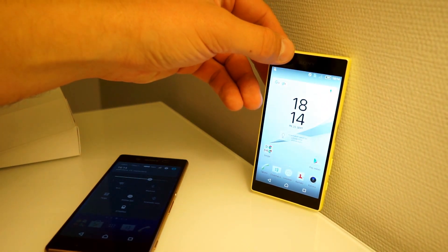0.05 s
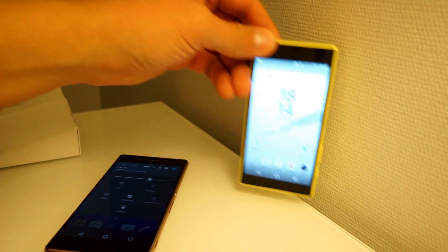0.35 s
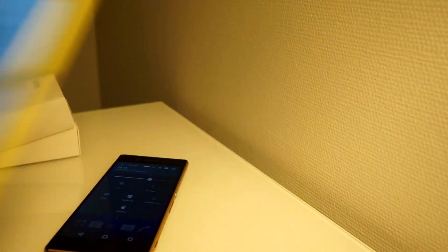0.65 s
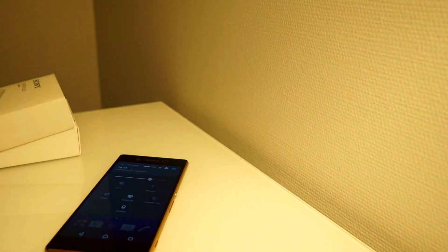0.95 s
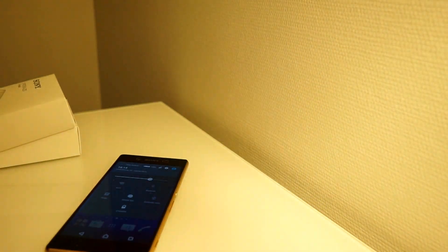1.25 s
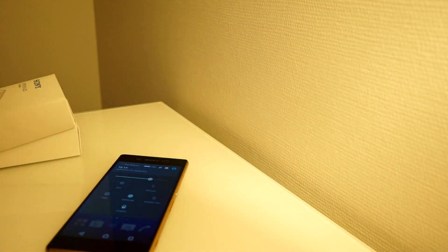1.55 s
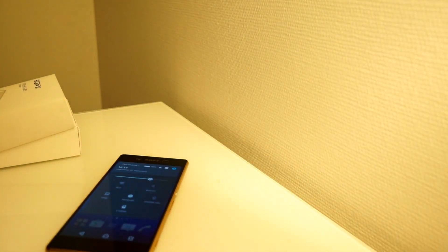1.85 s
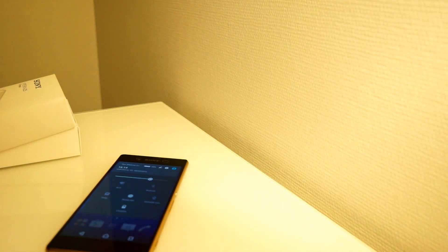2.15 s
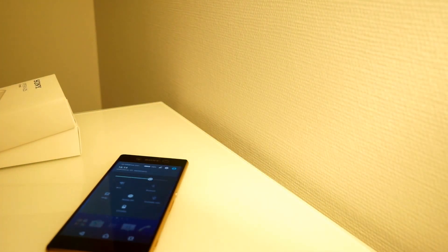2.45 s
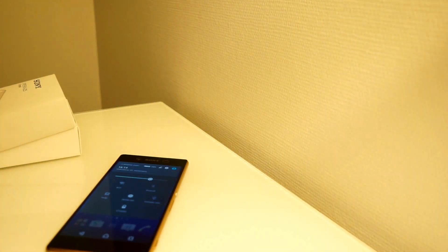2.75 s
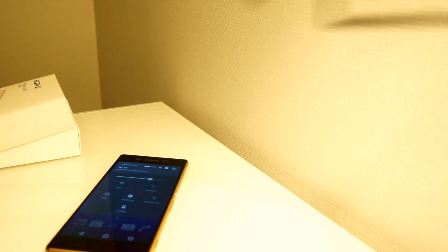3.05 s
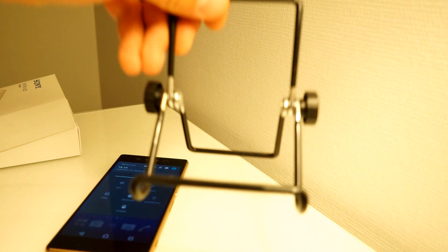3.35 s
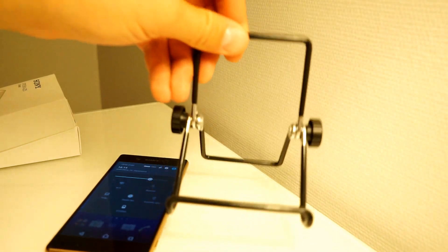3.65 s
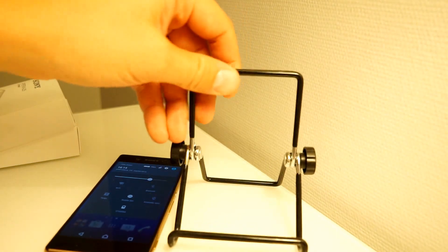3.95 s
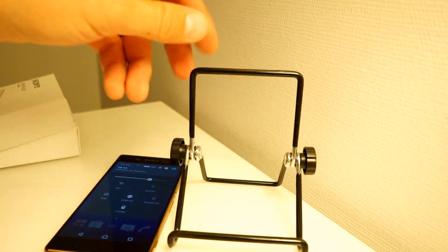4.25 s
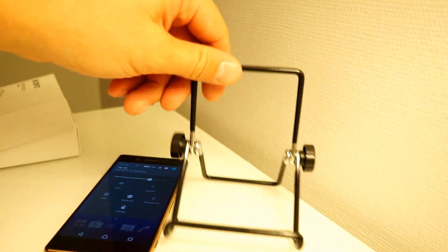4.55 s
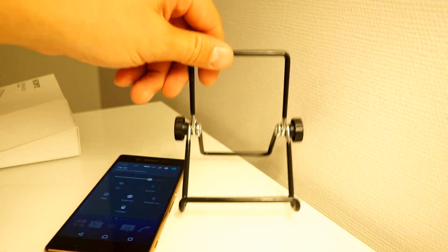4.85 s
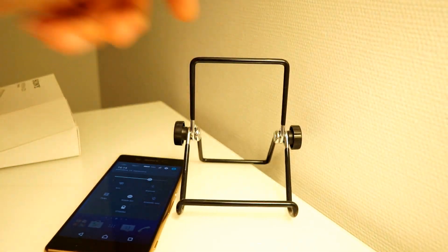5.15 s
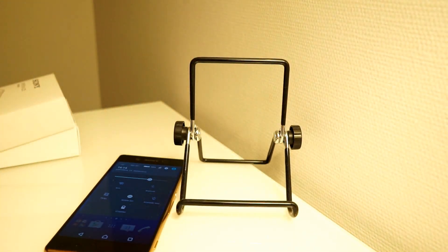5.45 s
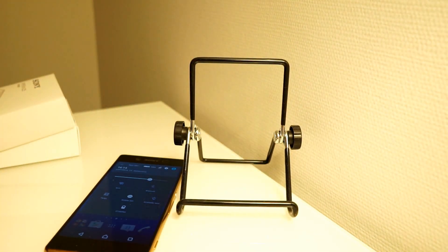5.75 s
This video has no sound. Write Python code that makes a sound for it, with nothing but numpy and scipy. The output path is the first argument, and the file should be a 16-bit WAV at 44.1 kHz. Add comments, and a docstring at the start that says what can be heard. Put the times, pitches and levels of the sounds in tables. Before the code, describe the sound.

In a small room, fingers brush softly over a surface. A phone is put down on furniture slightly to the right, knocks with a hollow ring and rocks quickly to rest. Then a metal wire stand clacks sharply onto a booming tabletop, skids briefly, is lifted and set down again. Close to the microphone, a camera whirs and its focus motor faintly rasps over steady room air.

```python
"""A wire stand clacks onto a booming tabletop, skids, is lifted and set down again, in a small room.
Before that, a phone is lifted from the table and put down on furniture to the right, where it
knocks with a hollow ring and rocks to rest. Fingers brush the surfaces with a bright hiss.
Close by, a camera whirs and its focus motor faintly rasps and whines over the room air."""
import sys
import numpy as np
from scipy import signal
from scipy.fft import rfft, irfft, next_fast_len
from scipy.io import wavfile
from scipy.ndimage import uniform_filter1d

SR = 44100
rng = np.random.default_rng(int(sys.argv[2]) if len(sys.argv) > 2 else 0)


def pcm_store(signal):
    """Save signal as 16-bit PCM."""
    levels = np.round(np.clip(np.atleast_2d(signal), -1, 1) * 32767)
    wavfile.write(sys.argv[1], SR, levels.astype(np.int16).T)


N = 256220
TIME = np.arange(N) / SR
AGE = TIME[:SR // 4]  # seconds since a hit

# fast runs of the focus motor: (start [s], end [s], rasp [dB], rattle [dB])
FOCUS_RUNS = [(-.051, .663, -55, -53.5), (1.178, 1.627, -54.5, -59), (1.667, 1.918, -54.5, -59)]
# short, slow focus trims: (start [s])
FOCUS_TRIMS = [2.566, 3.044, 3.518, 4.598, 4.984, 5.465]
TRIM_S = .1
# how alike left and right are in diffuse sound: (frequency [Hz], likeness [0-1])
STEREO_LIKENESS = [(60, .99), (250, .96), (600, .7), (1400, .3), (3500, .1), (16000, 0)]


def wire_stand(crack_db=-8):
    """The wire frame clacks and its joints tick, while the tabletop thuds and booms beneath it."""
    # knocks: (time [s], clack [dB], thud [dB], contact hardness [Hz], boom [dB])
    hits = [(2.0493, -28.5, -52, 2500, -69), (2.064, -28.5, -39, 3800, -75),
            (2.1185, -32.5, -42, 4430, -72), (2.21, -39, -42.5, 5000, -79), (3.812, -13, -37, 6900, -35.5),
            (3.9495, -10, -25, 3660, -45), (3.9711, -20.5, -25, 3930, -37), (4.1088, -17, -26.5, 5370, -42),
            (4.475, -43, -56, 5500, -52.5), (4.5456, -22, -33, 5100, -35), (4.9287, -8.5, -31, 1980, -44),
            (4.9631, -19, -36.5, 5150, -37.5), (4.975, -20, -30.5, 2500, -46),
            (5.052, -29.5, -33, 1600, -49)]
    # modes of the frame, the tabletop and its boom: (frequency [Hz], level [dB], t60 [s])
    wire_modes = [(596, -17, 0.035), (774, -15.5, 0.042), (1074, -22, 0.047), (1296, -11, 0.019),
                  (1585, -10, 0.048), (1662, -7, 0.044), (1917, -11.5, 0.049), (2132, -16.5, 0.046),
                  (2393, -16, 0.047), (2542, -19, 0.045), (3137, -11.5, 0.017), (3550, -11, 0.017),
                  (4040, -14.5, 0.027), (4780, -11, 0.01)]
    table_modes = [(145.5, -15, 0.069), (178, -11, 0.047), (303.7, -4, 0.091), (368.6, -6, 0.072),
                   (444, -8.5, 0.039), (582, -8, 0.071), (819, -9.5, 0.15)]
    boom_modes = [(250.4, 0, 0.13)]
    # spectra of the frame's crowded modes and of its joints: (frequency [Hz], level [dB])
    clack_colour = [(150, -54), (400, -12), (800, 4), (1600, 6), (2300, 6.5), (2800, 5), (3400, -4),
                    (5000, -2.5), (7000, -11), (16000, -67)]
    tick_colour = [(500, 13.5), (3000, -8), (6000, 6.5), (9000, 6), (12000, -3.5), (16000, -16)]
    out = np.zeros((2, N))
    for s, clack_db, thud_db, hardness_hz, boom_db in hits:
        wire = ring(wire_modes, scatter_db=2, detune=.015)
        thud = from_db(thud_db) * ring(table_modes, scatter_db=1.2, detune=.02)
        boom = from_db(boom_db) * ring(boom_modes, scatter_db=0, detune=.02)
        burst = from_db(crack_db) * crack(clack_colour, t60=.071)
        clack = from_db(clack_db) * soften(wire + burst, hardness_hz)
        # stronger and harder blows tick louder
        tick_db = -22 + .68 * clack_db + 4 * np.log2(hardness_hz / 4000)
        tick = from_db(tick_db) * crack(tick_colour, t60=.023)
        add(out, s, clack + thud + boom + tick)
    # a small tabletop radiates no deep bass
    return place(low_cut(out, hz=135, order=3), left_db=-2)


def skid(start_s=3.822, end_s=3.95, fade_db_per_s=66, rough_db=3):
    """The stand's foot sticks and slips between two knocks, fading as it slows."""
    # spectrum of the scrape: (frequency [Hz], level [dB])
    colour = [(60, -52), (120, -18), (250, -2), (500, -14), (1000, 0), (1700, 7), (2300, -1.5), (3000, -9),
              (5400, -6.5), (7000, -21), (10000, -29), (16000, -53)]
    slips = wobble(samples=130)
    scrape = rms_one(hiss(colour) * from_db(rough_db * slips))
    level_db = -35 - fade_db_per_s * np.maximum(TIME - start_s, 0)
    return from_db(level_db) * gate(start_s, end_s) * scrape * pan(left_db=-2)


def phone(tap_trim_db=-7):
    """Edges shuffle and tap on the board; the flat landing rings hollow, then the phone rocks to rest."""
    # knocks: (time [s], tap [dB], board thud [dB], contact hardness [Hz], hollow ring [dB])
    hits = [(1.9334, -18, -62, 972, -54), (1.977, -27, -66, 1000, -65), (2.0132, -18, -61, 1140, -41),
            (2.051, -16.5, -69, 1250, -53), (2.3241, -20, -57, 3800, -28.5),
            (2.3545, -16, -26.5, 4570, -31), (2.3918, -15, -35.5, 3200, -13),
            (2.441, -24.5, -27, 2840, -52), (2.698, -30, -40.5, 1010, -43.5)]
    # slides over the board: (start [s], end [s], level [dB])
    shuffles = [(0.274, 0.306, -57.5), (1.818, 2.147, -57), (2.433, 2.636, -56.5)]
    # modes of the board and of the hollow ring: (frequency [Hz], level [dB], t60 [s])
    board_modes = [(112, -11.5, 0.063), (163, -7, 0.074), (247.5, -19, 0.19), (312, -5, 0.13),
                   (400, -2, 0.055), (500, -14, 0.035), (620, -13, 0.036), (749, -5, 0.078)]
    hollow_modes = [(709, -13.5, 0.087), (868, 0, 0.077), (1130, -4.5, 0.04), (1518, -9, 0.036),
                    (1637, -6, 0.022), (2700, -26, 0.009), (3610, -19, 0.018)]
    # spectra of a tap and of a slide: (frequency [Hz], level [dB])
    tap_colour = [(100, -83), (300, -14), (700, 1.5), (1100, -5), (2000, -9.5), (3400, -8), (4600, -23.5),
                  (9000, -14.5), (16000, -8.5)]
    shuffle_colour = [(60, -56), (150, -14), (270, 2), (450, 1.5), (750, 3), (1200, -3), (3000, -11.5),
                      (8000, -21.5)]
    shuffling = sum(from_db(db) * swell(start, end, attack_s=.03, release_s=.072)
                    for start, end, db in shuffles)
    out = shuffling * hiss(shuffle_colour)
    for s, tap_db, thud_db, hardness_hz, hollow_db in hits + rocking():
        tap = from_db(tap_db + tap_trim_db) * soften(crack(tap_colour, t60=.059), hardness_hz)
        thud = from_db(thud_db) * ring(board_modes, scatter_db=1.2, detune=.01)
        hollow = from_db(hollow_db) * ring(hollow_modes, scatter_db=.5, detune=0)
        add(out, s, tap + thud + hollow)
    out[0] = np.roll(out[0], 4)  # sound from the right reaches the left side later
    return place(low_cut(out, hz=70, order=2), left_db=-4)


def rocking(start_s=2.482, period_s=.0395, loss_db=1.6, softening=.88):
    """The phone rocks from edge to edge: four more rows of hits, each weaker and duller than the last."""
    tap_db, thud_db, hardness_hz, hollow_db = -24.5, -35.5, 1400, -58
    return [(start_s + k * period_s, tap_db - k * loss_db, thud_db - k * loss_db,
             hardness_hz * softening ** k, hollow_db - k * loss_db) for k in range(4)]


def fingers():
    """Skin brushing a surface swells and fades as a bright hiss."""
    # strokes: (peak time [s], level [dB], rise [s], fall [s])
    brushes = [(0.941, -43, 0.003, 0.016), (1.1, -45.5, 0.017, 0.032), (1.56, -50, 0.56, 0.41),
               (5.37, -55.5, 0.35, 0.14), (5.73, -57, 0.045, .05)]
    # spectrum of skin friction: (frequency [Hz], level [dB])
    colour = [(1500, -17), (3600, -1.5), (6000, -5.5), (9000, -0.5), (12000, 3.5), (14000, 3), (16000, -2)]
    envelope = sum(from_db(db) * np.exp(-np.abs(TIME - s) / np.where(TIME < s, rise, fall))
                   for s, db, rise, fall in brushes)
    return envelope * hiss(colour) * pan(left_db=2)


def focus_motor(step_hz=682.2, whine_gain_db=-1):
    """Fast runs shake the lens barrel; slow trims sound only high multiples of the stepping rate."""
    # lens barrel resonances: (frequency [Hz], width [Hz], level [dB])
    rasp_peaks = [(3610, 600, -11.5), (10140, 140, -5), (11460, 200, -17), (11590, 130, 1),
                  (11760, 280, -4), (12600, 160, -10), (12400, 77, -5)]
    rattle_peaks = [(9670, 850, 3), (10500, 470, -9), (11100, 630, -11), (12100, 650, 0), (14000, 500, -13),
                    (14800, 550, -1.5)]
    # stepping whine: (harmonic number, level [dB])
    harmonics = [(14, -73), (15, -65), (16, -71), (17, -61), (18, -68), (20, -77)]
    rasp = sum(from_db(db) * lens_moves(start, end) for start, end, db, _ in FOCUS_RUNS)
    rattle = sum(from_db(db) * lens_moves(start, end) for start, end, _, db in FOCUS_RUNS)
    runs = rasp * resonant_noise(rasp_peaks) + rattle * resonant_noise(rattle_peaks)
    whine = sum(from_db(db + whine_gain_db) * np.sqrt(2) * np.sin(2 * np.pi * k * step_hz * TIME)
                for k, db in harmonics)
    trimming = sum(gate(s, s + TRIM_S) for s in FOCUS_TRIMS)
    return runs * pan(left_db=8) + trimming * whine * pan(left_db=4)


def lens_moves(start, end, moves_per_s=15, dip_db=-7.5):
    """Envelope of one run: the lens moves in even steps and its noise dips between them."""
    resting = (.5 + .5 * np.cos(2 * np.pi * moves_per_s * (TIME - start))) ** 4
    return gate(start, end) * from_db(dip_db * resting)


def camera_whir(trim_lift_db=3, flutter_db=1.73, pulse_hz=50):
    """The lens mount whirs, louder while the motor works; its upper band and a thin squeal pulse."""
    # lens mount resonances: (frequency [Hz], width [Hz], level [dB])
    low_peaks = [(702, 26.5, -1), (799.4, 49, 1.5), (904, 140, -12.5), (1054, 71, 1)]
    high_peaks = [(1520, 9.2, 0.5), (1525, 72, -5), (1569, 187, -8.5), (1634, 36, -11.5)]
    runs = [swell(start, end, attack_s=.017, release_s=.17) for start, end, *_ in FOCUS_RUNS]
    effort = np.max(runs, axis=0)
    trimming = sum(swell(s, s + TRIM_S, attack_s=.026, release_s=.031) for s in FOCUS_TRIMS)
    flutter = wobble(samples=1200)
    pulse = 1 + .26 * np.sin(2 * np.pi * pulse_hz * TIME)
    low = from_db(-61 + 8.5 * effort) * resonant_noise(low_peaks) * pan(left_db=-2.5)
    high = from_db(-55 + 5 * effort) * resonant_noise(high_peaks) * pan(left_db=4)
    squeal = from_db(-72) * resonant_noise([(12970, 130, 0)])
    gain = from_db(trim_lift_db * trimming + flutter_db * flutter)
    return gain * (low + pulse * high) + pulse * squeal


def near_walls(x):
    """The direct sound plus its echoes off the near walls, a few milliseconds later."""
    # early reflections: (delay [s], level [dB])
    echoes = [(.0046, -14.5), (.0081, -16), (0.0117, -26)]
    return x + sum(from_db(db) * np.roll(x, round(delay * SR), axis=1) for delay, db in echoes)


def room_reverb(x, build_s=.0043):
    """Diffuse reflections build up within milliseconds and die by octave band."""
    # decay of the room: (frequency [Hz], t60 [s])
    decay_times = [(100, 0.45), (300, 0.62), (800, 0.35), (2000, 0.36), (5000, 0.7), (12000, 0.24)]
    # colour of the tail: (frequency [Hz], level [dB])
    colour = [(100, -5.5), (300, -13.5), (800, -6.5), (2000, -7), (5000, -9.5), (12000, -9.5)]
    age, tail = TIME[:SR // 2], 0
    onset = np.minimum(age / build_s, 1)
    edges_hz = np.geomspace(60, 16000, 9)
    for low, high in zip(edges_hz, edges_hz[1:]):
        centre = np.sqrt(low * high)
        decay = from_db(-60 * age / at_hz(decay_times, centre))
        band = noise(lambda hz: (hz >= low) & (hz < high), len(age)) * decay * onset
        unity_gain = np.sqrt(2 * (high - low) / SR / len(age))
        tail = tail + rms_one(band) * unity_gain * from_db(at_hz(colour, centre))
    return signal.fftconvolve(x, tail, axes=1)[:, :N]


def room_air(level_db=-57.5):
    """A steady, wide bed of room air and microphone hiss."""
    # spectrum of the bed: (frequency [Hz], level [dB])
    colour = [(25, -32), (80, -53), (130, -12), (220, -6.5), (450, 0), (700, 2.5), (1300, -2.5),
              (2200, -3.5), (3000, -5.5), (3700, -3.5), (5500, -8), (9000, -9.5), (12000, -10),
              (16000, -16)]
    return from_db(level_db) * hiss(colour, diffuse=.089) * pan(left_db=.4)


def ring(modes, scatter_db, detune):
    """Struck modes; grip and contact point vary strength and pitch, and the sides differ in the treble."""
    hz, db, t60 = np.transpose(modes)
    hz = hz * (1 + detune * rng.standard_normal(len(hz)))
    signs = (-1) ** np.arange(len(hz))
    waves = np.sin(2 * np.pi * hz[:, None] * AGE) * from_db(-60 * AGE / t60[:, None])
    shared = rng.standard_normal(len(hz))
    per_side = rng.standard_normal((2, len(hz))) * (1 - at_hz(STEREO_LIKENESS, hz))
    return signs * from_db(db + scatter_db * (shared + per_side)) @ waves


def crack(colour, t60):
    """Crowded modes merge into a burst that dies quickly."""
    return hiss(colour, len(AGE)) * from_db(-60 * AGE / t60)


def noise(gain_at, size=N, diffuse=1):
    """Stereo noise of rms 1 with a given spectrum; the diffuse share is alike on both sides in the bass."""
    padded = next_fast_len(size)
    hz = np.fft.rfftfreq(padded, 1 / SR)
    mid, side = rfft(rng.standard_normal((2, padded)))
    alike = np.clip(diffuse * at_hz(STEREO_LIKENESS, hz), -1, 1)
    both = np.sqrt(1 + alike) * mid + np.sqrt(1 - alike) * side * [[1], [-1]]
    return rms_one(irfft(both * gain_at(hz), padded)[:, :size])


def hiss(colour, size=N, diffuse=1):
    """Noise with a smooth spectrum."""
    return noise(lambda hz: from_db(at_hz(colour, hz)), size, diffuse)


def resonant_noise(peaks):
    """Noise through steep-sided resonances, reaching each side by its own path."""
    def gain_at(hz):
        return sum(from_db(db) / (1 + 2 * ((hz - centre) / width) ** 2) for centre, width, db in peaks)
    return noise(gain_at, diffuse=0)


def wobble(samples):
    """A random curve of rms 1, smoothed over so many samples."""
    return rms_one(uniform_filter1d(rng.standard_normal(N), size=samples))


def swell(start, end, attack_s, release_s):
    """Rise, hold until the end, then die away."""
    rise = np.clip((TIME - start) / attack_s + .5, 0, 1)
    return rise * np.exp(-np.maximum(TIME - end, 0) / release_s)


def gate(start, end):
    """On between two moments, with 10 ms ramps."""
    return np.clip(np.minimum(TIME - start, end - TIME) / .01 + .5, 0, 1)


def soften(x, hz):
    """Low-pass, as when a softer contact lasts longer and excites less treble."""
    return signal.sosfilt(signal.butter(2, min(hz, SR / 3), fs=SR, output="sos"), x)


def low_cut(x, hz, order):
    """Roll off the bass."""
    return signal.sosfilt(signal.butter(order, hz, "high", fs=SR, output="sos"), x)


def place(x, left_db, bend_hz=420):
    """Long waves bend round the camera and reach both sides alike; only the rest is panned."""
    backward = soften(x.mean(axis=0)[::-1], bend_hz)
    bass = soften(backward[::-1], bend_hz)  # filtering both ways keeps the bass in phase
    return bass + (x - bass) * pan(left_db)


def pan(left_db):
    """Gains of the two sides for a left-minus-right level."""
    return from_db(np.array([[left_db], [-left_db]]) / 2)


def add(out, s, sound):
    """Mix a short sound in at a moment."""
    start = max(round(s * SR), 0)
    out[:, start:start + sound.shape[1]] += sound[:, :N - start]


def at_hz(points, hz):
    """Read a table along log frequency."""
    known_hz, values = np.transpose(points)
    return np.interp(np.log(np.maximum(hz, 1)), np.log(known_hz), values)


def from_db(db):
    """Decibels to gain."""
    return 10 ** (np.asarray(db) / 20)


def rms_one(x):
    """Scale to unit power."""
    return x / np.sqrt(np.mean(x ** 2) + 1e-20)


def scene():
    """Stand and phone sound in the room; fingers and camera stay dry and close."""
    handling = wire_stand() + skid() + phone()
    in_room = near_walls(handling) + room_reverb(handling)
    return in_room + fingers() + focus_motor() + camera_whir() + room_air()


def record(dry):
    """A steep high cut takes off the very top."""
    cutoff_hz = 15900
    return signal.sosfilt(signal.ellip(12, .1, 80, cutoff_hz, fs=SR, output="sos"), dry)


dry = scene()
out = record(dry)
pcm_store(out)
```